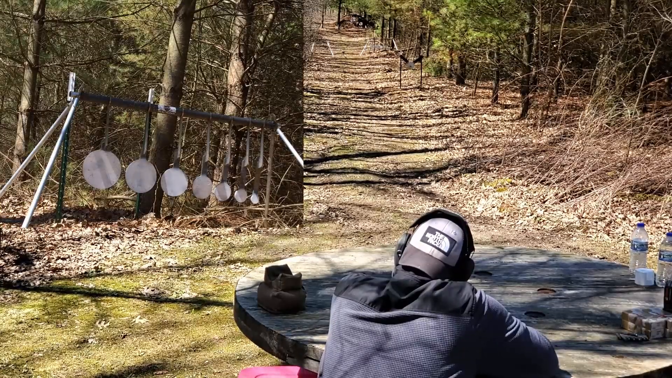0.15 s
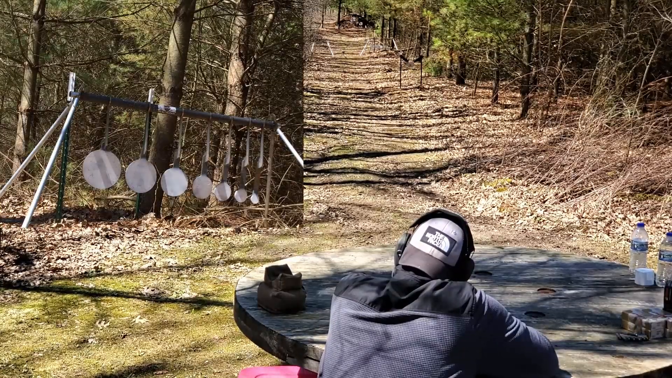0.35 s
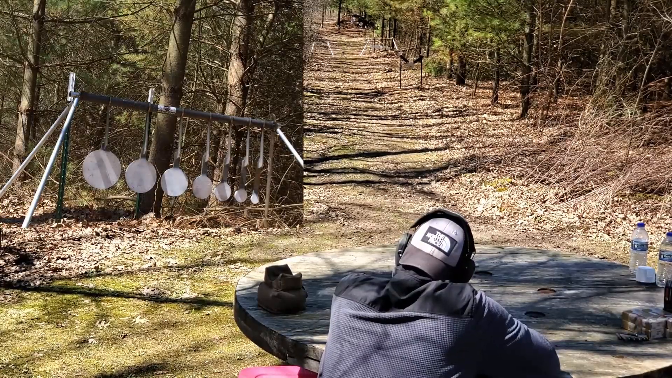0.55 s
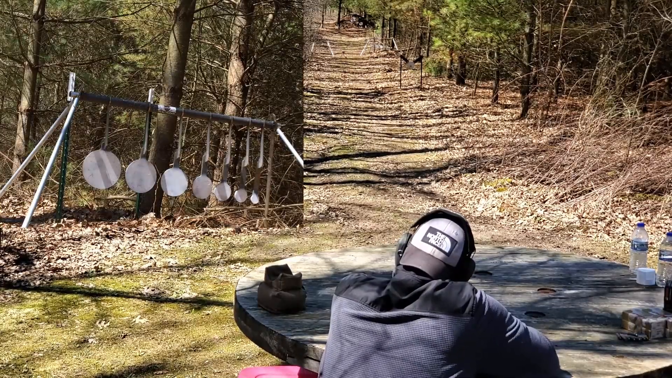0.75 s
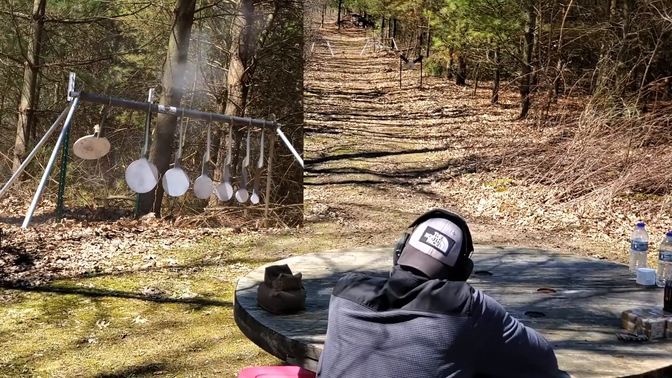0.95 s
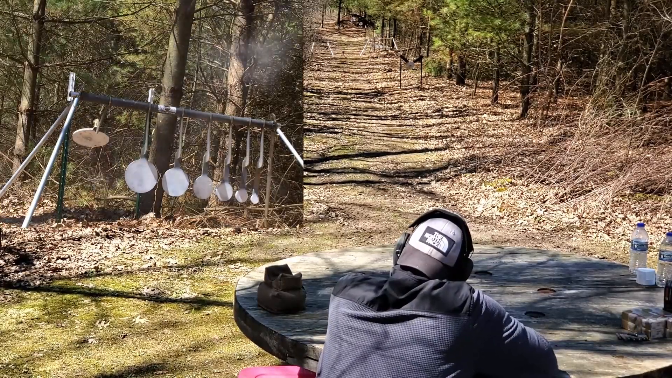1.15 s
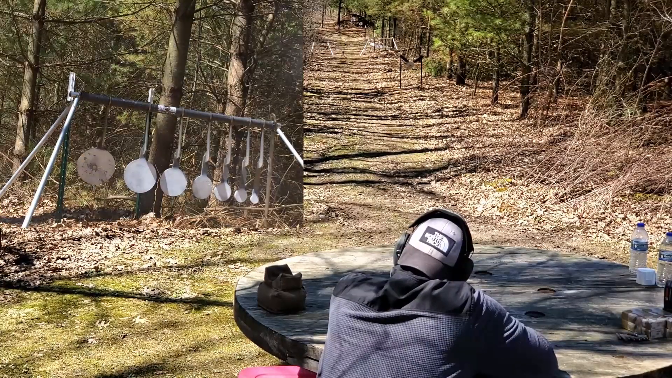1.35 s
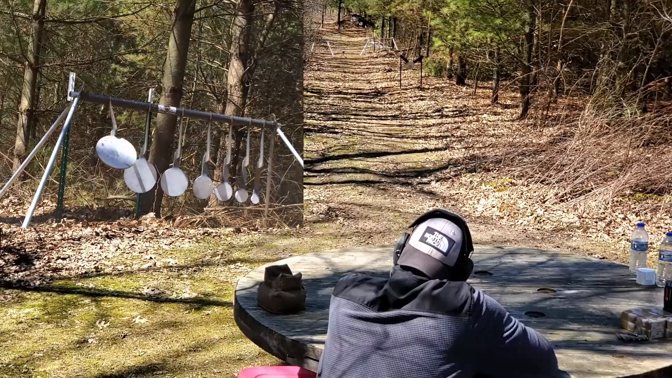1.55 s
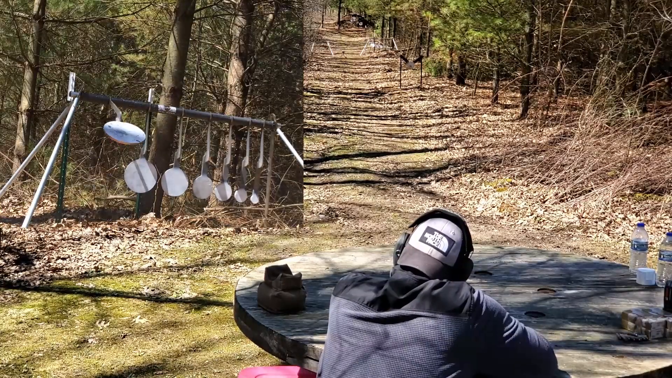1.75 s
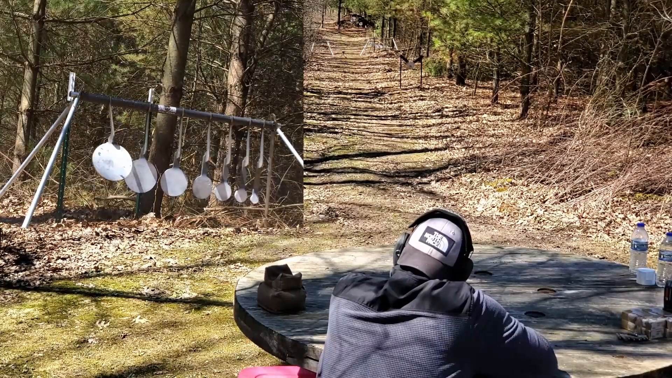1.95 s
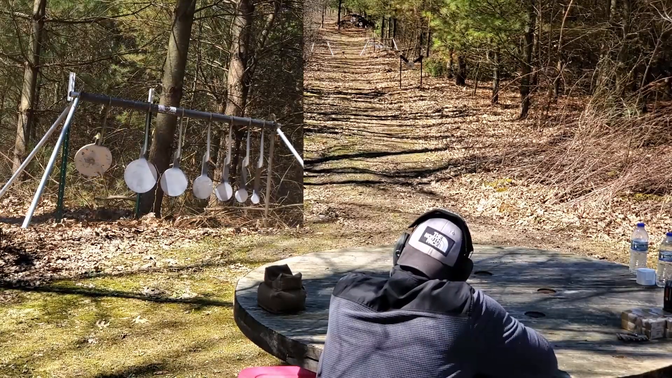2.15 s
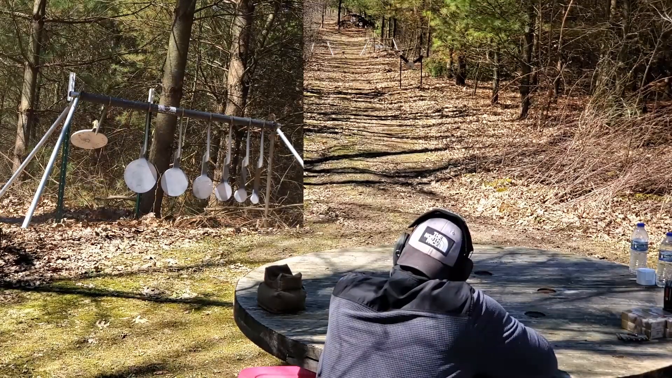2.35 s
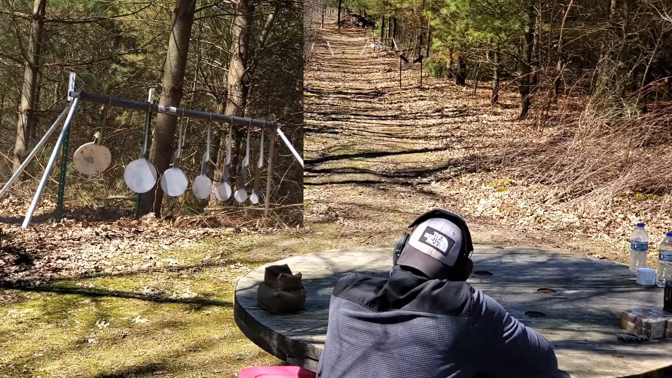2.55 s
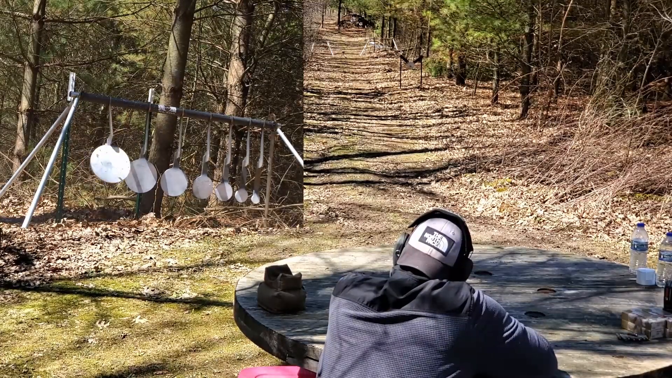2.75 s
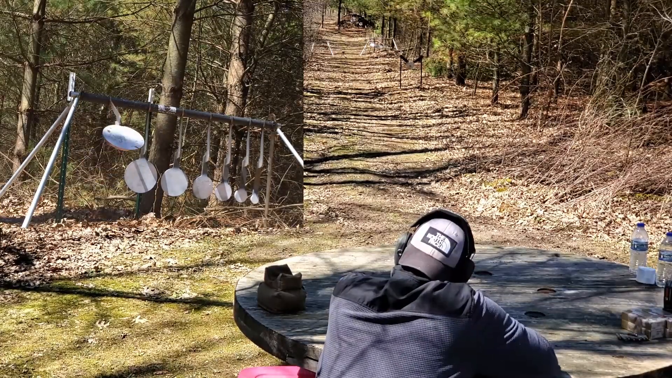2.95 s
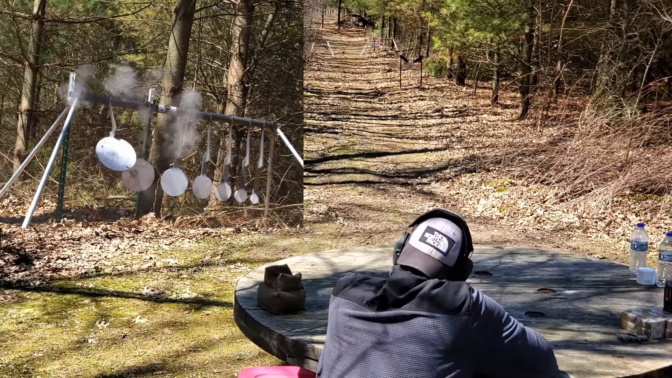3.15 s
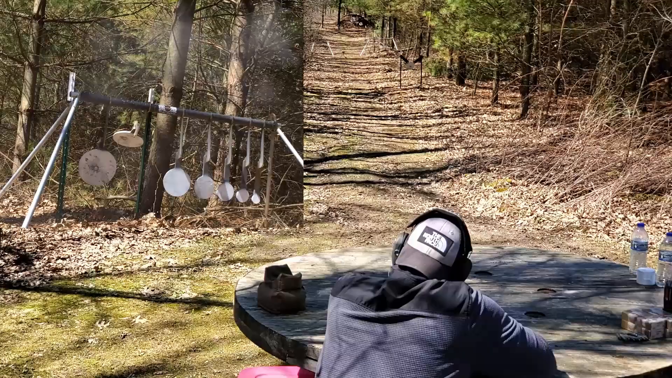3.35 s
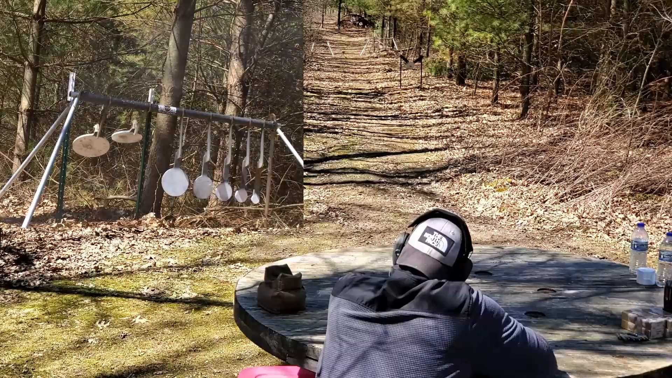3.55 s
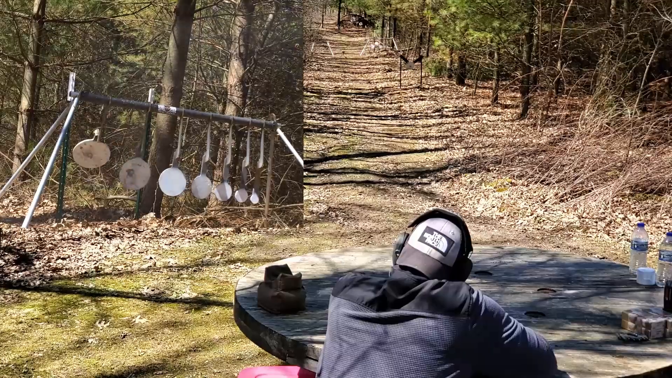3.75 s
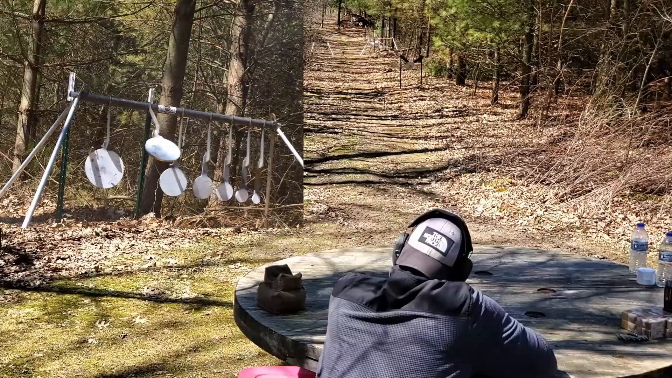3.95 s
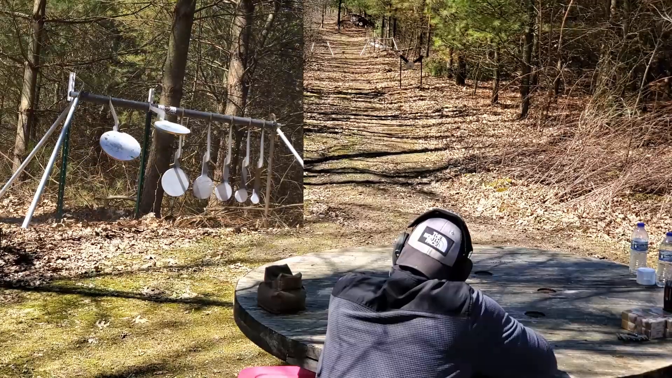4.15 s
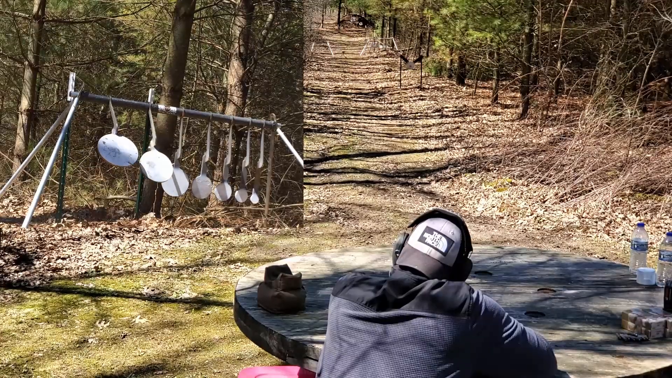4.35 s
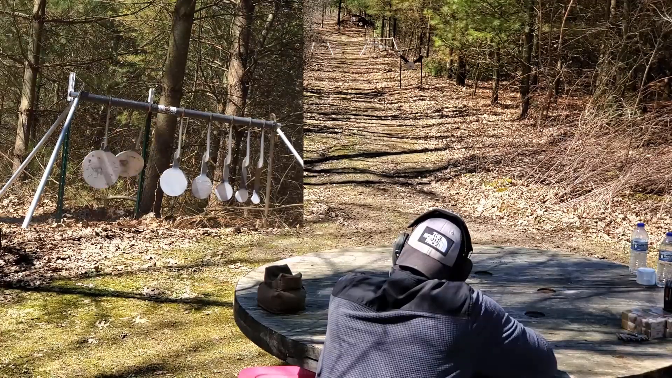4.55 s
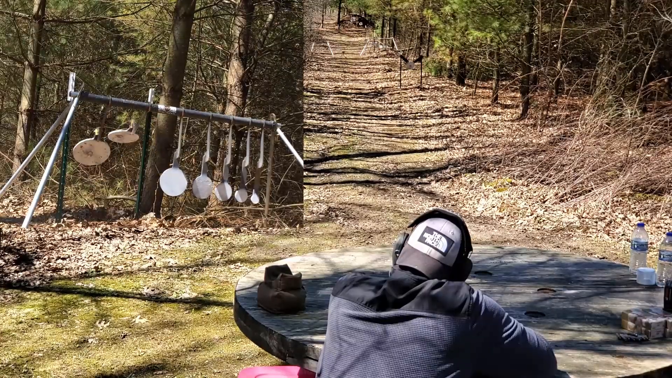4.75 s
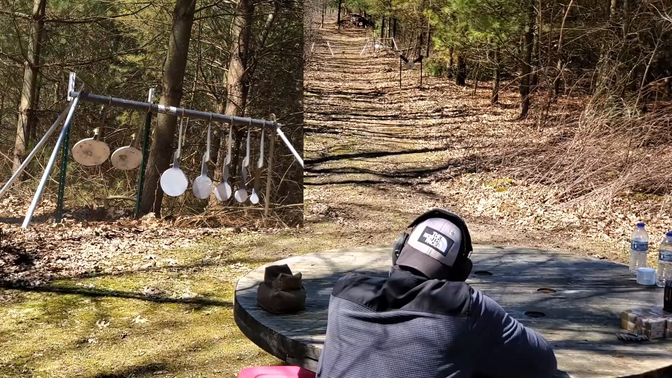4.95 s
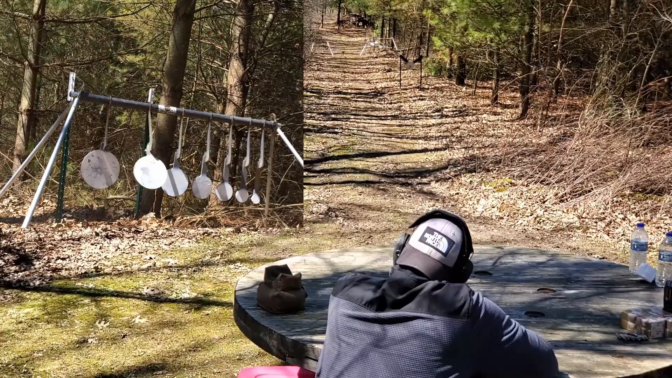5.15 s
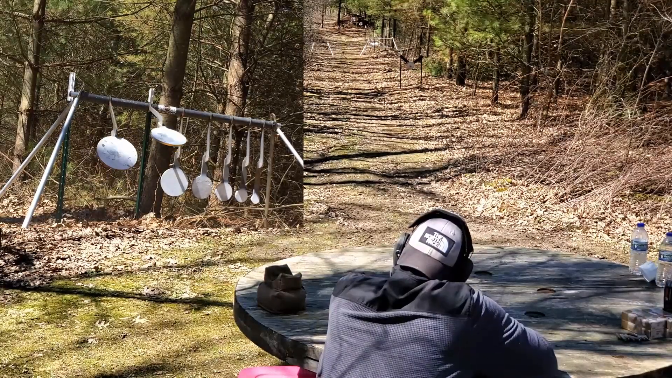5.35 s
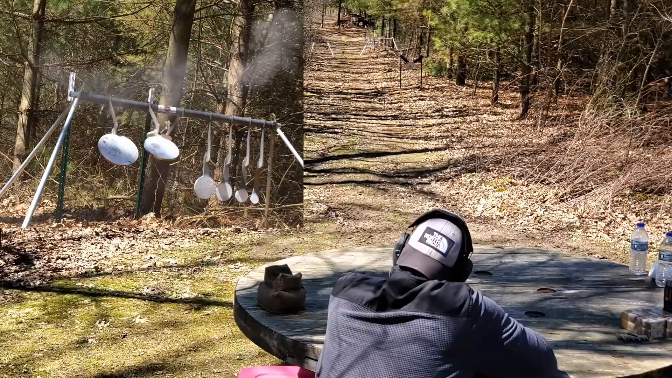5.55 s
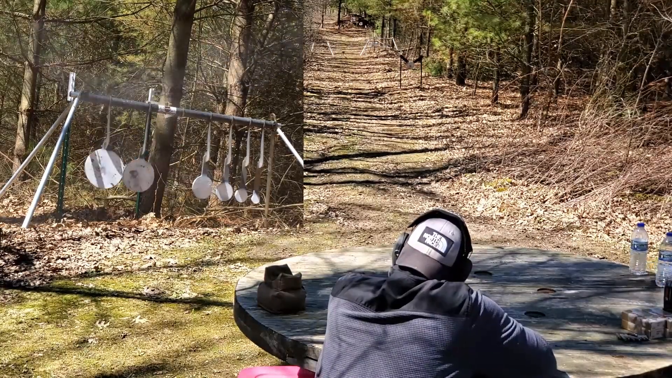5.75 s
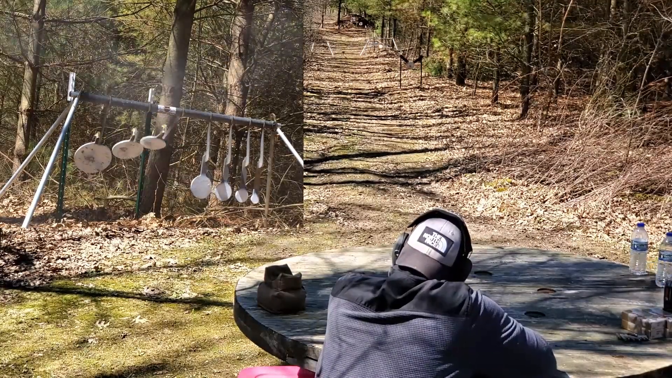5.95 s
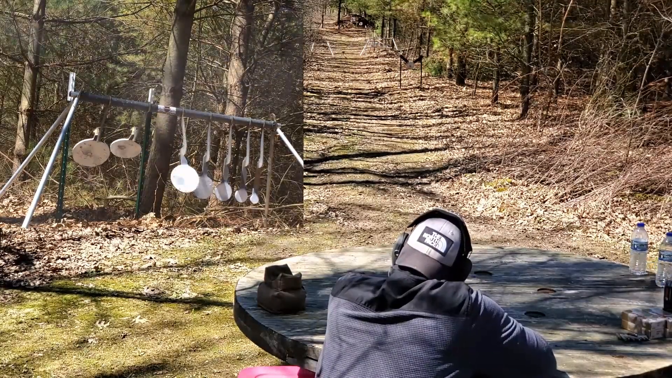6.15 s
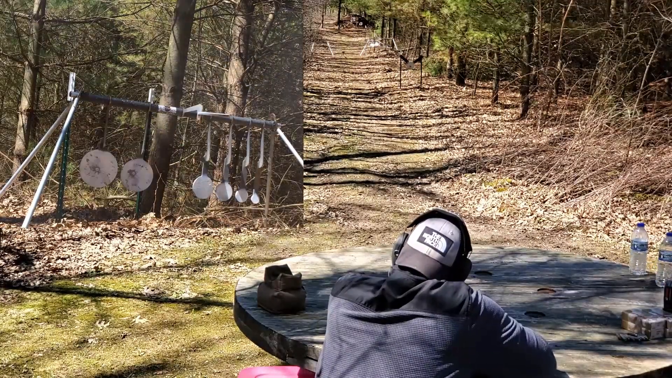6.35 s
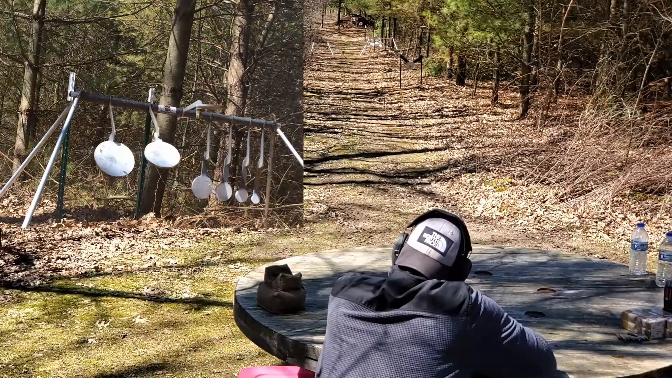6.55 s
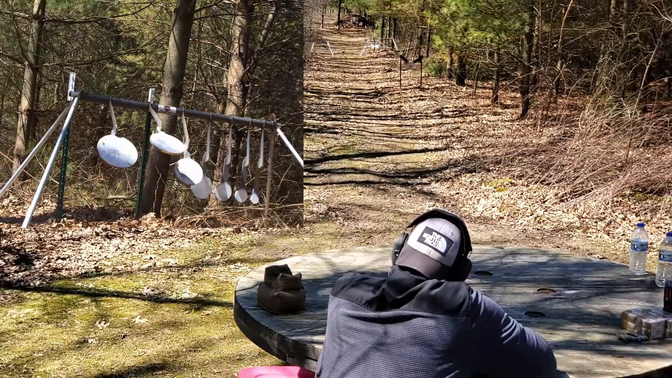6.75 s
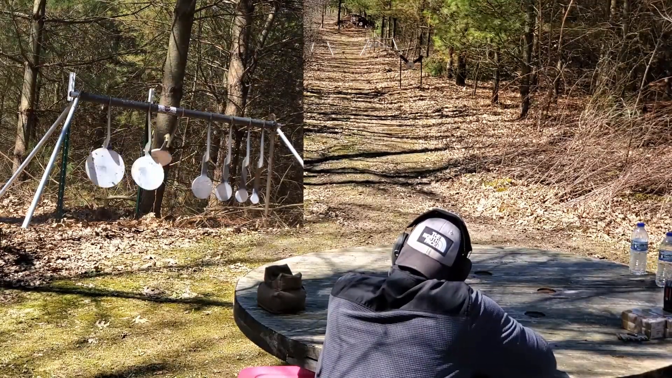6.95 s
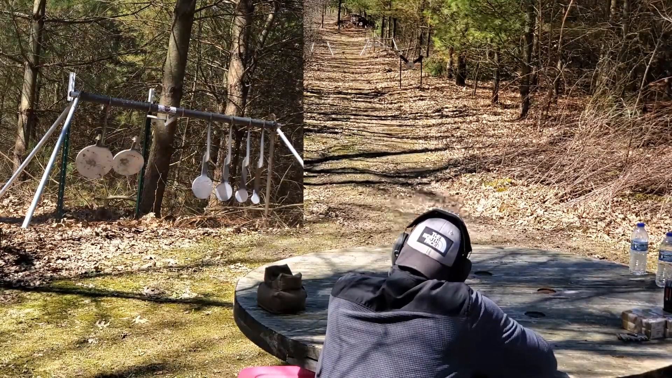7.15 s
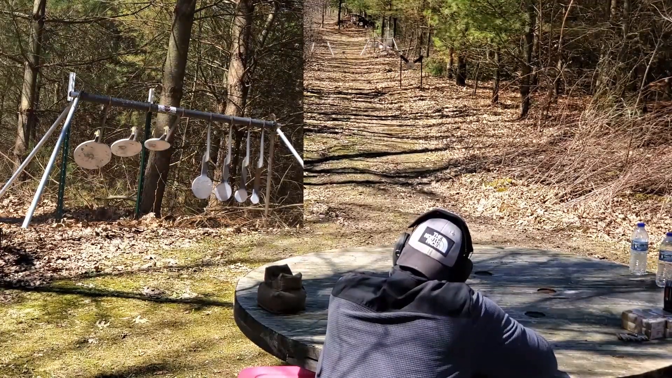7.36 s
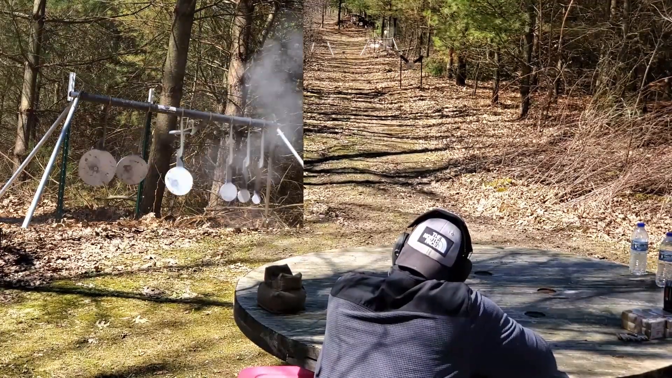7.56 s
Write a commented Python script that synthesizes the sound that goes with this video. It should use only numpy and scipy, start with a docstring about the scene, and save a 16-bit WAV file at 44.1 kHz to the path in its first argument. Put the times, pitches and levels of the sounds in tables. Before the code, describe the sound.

Very quiet woodland air for half a second, then a tiny firing-pin click and a huge rifle blast at 0.55 s, hard-clipped at the shooter's microphone, with bright slaps from trunks and a hollow echo rolling away for over a second. A faint distant ring arrives near 0.78 s; at 0.89 s the close target microphone catches a sharp bullet smack, a hissing lead spray and a clear ring around 4.5 kHz, fading and returning as the plate swings. From about 2 s fragments tick on dry leaves over fine dust; a handling click falls at 2.8 s. The second shot at 2.9 s strikes at 3.25 s, ringing near 6 kHz, followed by patter. The third fires at 5.15 s and hits at 5.5 s with a shorter, mixed ring; ticks and faint clinks follow. The fourth fires at 7.2 s, hitting at 7.54 s with a thin ring near 11 kHz, its tail ending the scene.

```python
"""Rifle shots on steel in the woods

Four rifle shots at a woodland range, heard by two cameras mixed together. By the shooter, shaped noise gives
the blast, which overloads the microphone and rolls away among the trees. By the targets each bullet bursts on
a hanging steel plate: noise for the lead spray, decaying sines for the ringing plate, and noise bursts for
fragments pattering down on dry leaves. Clicks, clinks and the quiet air of the woods lie around them.
"""
import sys
import numpy as np
from scipy import signal
from scipy.fft import rfft, irfft, next_fast_len
from scipy.io import wavfile
from scipy.ndimage import map_coordinates

SR = 44100
rng = np.random.default_rng(int(sys.argv[2]) if len(sys.argv) > 2 else 0)


def unload_audio(sound):
    """Save the sound as a 16-bit wav file, at the path given as the first command line argument."""
    columns = np.transpose(np.atleast_2d(sound))
    # keep every value between -1 and 1, then stretch to whole-number steps
    steps = np.round(np.clip(columns, -1, 1) * 32767)
    wavfile.write(sys.argv[1], SR, steps.astype(np.int16))


N = 336042  # samples

# The four shots. Each row: start in seconds, strength in dB, level in dB of the short bright noise just ahead
# of the blast.
SHOTS = [(.548, 0.04, -10.5), (2.905, -0.77, -17), (5.152, 0.3, -12.5), (7.192, -0.9, -16.5)]
# Decay of the answer of the woods. Each row: time after the shot in seconds, level in dB.
WOODS_DECAY = [(0, 1), (.03, -5), (.1, -1.5), (.2, -12.5), (.282, -12), (.294, -20), (.34, -15),
               (.5, -21.5), (.62, -25.5), (.75, -27), (1.15, -33.5), (1.4, -43), (1.75, -52), (3, -65.5)]
# Spectrum of the young echo. Each row: frequency in Hz, relative density in dB per Hz.
BOOM_COLOUR = [(25, -38.5), (60, -9), (130, -9.5), (250, -7.5), (350, -5), (420, 0), (500, 0), (580, -4.5),
               (750, -11.5), (1200, -19), (2500, -21), (6000, -32.5), (16000, -38)]
# Extra loss of the echo as it ages. Each row: frequency in Hz, loss in dB per second.
WOODS_DULLING = [(60, -8.5), (200, -0.5), (450, 3), (1000, -3), (2000, 3), (3000, 7.5), (4500, 17.5),
                 (8000, 36.5), (16000, 63)]
# Farther slopes that answer with a soft swell. Each row: time after the shot in seconds, rise in dB.
SLOPES = [(.37, 1.5), (.54, 3), (.98, 0.3), (1.17, 0.5)]
# Trunks that send back a bright slap. Each row: time after the shot in seconds, peak level in dB relative
# to the shot, length in seconds.
TRUNKS = [(0.018, -15, 0.011), (0.058, -11, 0.016), (.083, 0.5, 0.017), (0.114, -17, .012),
          (.16, -13, .012), (0.21, -17, 0.017)]
SLOPE_S = .025  # half width of a swell
SLAP_SCATTER_S = .003  # from shot to shot


def rifle():
    """Impulse response of a forest: a muzzle crack, dense scattered reflections and discrete bright slaps."""
    out, t = np.zeros(N), np.arange(3 * SR) / SR
    nearby = round(.288 * SR)  # the bright crowd of slaps stops here
    crowd_colour = [(1500, -18.5), (5000, 0.2), (10000, 9), (16000, -18.5)]
    swells_db = sum(db * np.exp(-((t - s) / SLOPE_S) ** 2) for s, db in SLOPES)
    woods_db = np.interp(t, *np.transpose(WOODS_DECAY)) + swells_db
    for s, db, _ in SHOTS:
        roll = fading(len(t), BOOM_COLOUR, lambda hz: along(WOODS_DULLING, hz))
        roll_db = woods_db + 0.88 * wobble(len(t), rate=12) + 1.6 * wobble(len(t), rate=45)
        add(out, s, amp(db + roll_db) * roll * (1 - np.exp(-t / 0.0059)))

        crack = puff(4100, 2.5, spread=3.4)[:round(.009 * SR)]
        add(out, s, amp(db + 8.5) * crack)

        # many small slaps crowd together
        crowd = fading(nearby, crowd_colour, lambda hz: 70 + 0 * hz)
        add(out, s, amp(db - 23 + 5.6 * wobble(nearby, rate=190)) * crowd)

        for delay, slap_db, length in TRUNKS:
            u = np.arange(SR // 10) / SR / np.abs(length)
            slap = puff(6500, 1.7, spread=0.44) * u * 3 * np.exp(1 - 3 * u)  # swells for a third of its length
            late = SLAP_SCATTER_S * rng.standard_normal()
            add(out, s + delay + late, amp(db + slap_db) * slap)
    return out


# Bullets on steel. Each row: start in seconds, strength in dB, time in seconds when the shooter hears
# the ring, ring level there in dB.
HITS = [(0.8892, -0.6, .778, -11), (3.246, -0.3, 3.113, -10), (5.493, -0.5, 5.37, -11.5),
        (7.537, -1.3, 7.425, -25)]
# Modes of the four plates, one list a plate. Each row: frequency in Hz, level in dB, t60 in seconds,
# time in seconds until the mode's lobe turns to the microphone.
PLATES = [
    [(4505, -4, 1.1, .115), (4743, -12, .5, .11), (7376, -12, .45, .08), (7410, -16, .5, .11),
     (7585, -15, .75, .12), (7988, -28, .6, .01), (8527, -20, .7, .02), (10179, -22, .4, .04),
     (10809, -26, .4, .02), (12508, -15, .5, .02), (12545, -19, 1.15, .09), (13705, -24, .4, .05),
     (15019, -21, .4, .02), (15160, -36, .8, .01), (15622, -42, .5, .01)],
    [(5964, -7, .7, .075), (6040, -24, 1.1, .06), (6206, -10, .55, .1), (9738, -23, .6, .05),
     (9786, -18, .7, .1), (10029, -22, .6, .05), (10594, -26, .45, .04), (11794, -30, .6, .12),
     (13361, -35, 1.8, .14), (14486, -31, .9, .02), (14944, -35, .4, .02), (15040, -34, .4, .05),
     (15127, -35, .4, .05)],
    [(5130, -9, .22, .025), (7851, -18, .8, .03), (7889, -14, 1.1, .08), (7983, -13, 1.5, .14),
     (8500, -28, .5, .08), (12984, -18, .6, .01), (13030, -21, .9, .01), (13175, -26, 1.0, .1),
     (13970, -31, .4, .01), (14211, -33, .4, .05), (15302, -36, .5, .01), (15680, -28, .7, .01),
     (15719, -26, .8, .01)],
    [(10700, -26, .6, .04), (11116, -10, .8, .035), (11162, -18, .8, .03), (11790, -32, .6, .04),
     (12500, -35, .5, .01), (13210, -37, .5, .01), (13840, -40, .5, .01), (14620, -35, .5, .02),
     (15650, -38, .2, .01)],
]
# How each plate faces the microphone, swings edge-on, turns back and then away. Each row: facing level in dB,
# end of facing in seconds after the hit, edge-on time in seconds, edge-on level in dB, time back in seconds,
# level back in dB, speed towards the microphone in m/s.
SWINGS = [(0.5, 0.152, .37, -23, 0.56, -3, 3), (4.5, 0.087, 0.36, -25.5, 0.71, -8, 0),
          (-0.8, 0.13, .42, -23, 0.69, -15, -1.5), (6.5, 0.035, 0.24, -20, .6, -10, -5)]
# Spectrum of the bullet burst. Each row: frequency in Hz, relative density in dB per Hz.
BURST_COLOUR = [(200, -23.5), (600, 1.5), (1500, -0.5), (3000, 1.5), (6000, -0.5), (11000, -1.5),
                (16000, -14)]
# The lead spray and its echoes among the near trees. Each row: time after the hit in seconds, level in dB.
SPRAY_DECAY = [(0, -14.5), (.03, -17), (.1, -13.5), (.17, -16), (.22, -18.5), (.28, -23.5), (.4, -28),
               (.7, -37), (1.2, -66)]
# Extra loss of the spray as it ages. Each row: frequency in Hz, loss in dB per second.
SPRAY_DULLING = [(300, -7.5), (1500, -3), (4000, 38.5), (8000, 70), (16000, 121)]


def steel():
    """Impact excitation: burst and modal ring by the targets, and the faint ring that reaches the shooter.

    The shooter's camera runs a little ahead. Returns the sound at the targets and at the shooter.
    """
    near, far = np.zeros(N), np.zeros(N)
    t = np.arange(round(1.2 * SR)) / SR
    far_t = t[:SR // 4]
    smack = t[:200] / 0.000059
    for (s, db, far_s, far_db), modes, motion in zip(HITS, PLATES, SWINGS):
        spray = fading(len(t), BURST_COLOUR, lambda hz: along(SPRAY_DULLING, hz))
        spray_db = np.interp(t, *np.transpose(SPRAY_DECAY)) + 1.4 * wobble(len(t), rate=76)
        add(near, s, amp(db + spray_db) * spray)
        add(near, s, amp(db - 17) * (smack - 1) * np.exp(-smack))  # brief pressure pulse
        add(near, s, amp(db - 10.5) * puff(9000, 0.06, spread=1.1))  # the bullet shatters
        add(near, s, ring(modes, len(t), *swing(t, *motion)))

        # air takes the treble on the way to the shooter
        dull = [(hz, level - .8 * hz / 1000, t60, .003) for hz, level, t60, _ in modes]
        add(far, far_s, ring(dull, len(far_t), far_db - 150 * far_t, 0 * far_t))
    return near, far


def ring(modes, size, facing_db, speed):
    """Modal synthesis: decaying sines whose lobes turn with the swing and whose pitch bends by Doppler shift."""
    t = np.arange(size) / SR
    heard = np.cumsum(1 + speed / 343) / SR  # time as compressed by the plate's approach
    total = np.zeros(size)
    for hz, db, t60, turn in modes:
        flutter = amp(1.5 * wobble(size, rate=14) + 2.5 * wobble(size, rate=70))  # scattered by trunks
        lobe = 1 - np.exp(-(t / turn) ** 4)
        tone = np.sin(2 * np.pi * (hz * heard + rng.random()))
        total += amp(db - 60 * t / t60) * flutter * lobe * tone
    return amp(facing_db) * total * (1 - np.exp(-t / 0.0043))


BACK_HOLD_S, AWAY_S, AWAY_DB = 0.083, 0.32, -40  # how long it faces again, time to turn away, level then


def swing(t, facing_db, until, edge, edge_db, back, back_db, speed):
    """Directivity and motion: how a swinging plate faces the microphone (dB) and how fast it nears it (m/s)."""
    when = [until, edge, back, back + BACK_HOLD_S, back + BACK_HOLD_S + AWAY_S]
    level_db = np.interp(t, when, [facing_db, edge_db, back_db, back_db, AWAY_DB])
    return level_db, np.interp(t, [until, edge], [0, speed])


# The loudest fragments landing on leaves. Each row: start in seconds, peak level in dB, centre in Hz.
PATTER = [(1.9729, -45, 8960), (2.0782, -36.5, 3300), (2.1251, -39, 10100), (2.1889, -40, 6380),
          (2.2697, -40, 6370), (2.2946, -36, 7260), (2.3336, -40, 10700), (2.4219, -40, 6830),
          (2.4633, -40, 10900), (2.5052, -42, 7780), (3.9232, -32.5, 6280), (3.9724, -35.5, 6900),
          (4.0537, -37, 8280), (4.1111, -38, 5640), (4.3111, -42, 5540), (4.4034, -43, 9680),
          (4.4702, -39, 10200), (4.565, -40, 9010), (4.6783, -43, 7810), (6.3614, -38, 6870),
          (6.4617, -43, 5260), (6.4971, -40, 6370), (6.5186, -42, 6340), (6.6238, -45, 10100),
          (6.9174, -35.5, 9810)]
TICK_T60, TICK_SPREAD = 0.011, .5  # s, width over centre
TICKS = 14  # fainter fragments after each hit
TICK_FIRST_S, TICK_SPAN_S = .85, 1.05  # earliest landing after the hit, span of landings
TICK_DB, TICK_FADE_DB, TICK_SCATTER_DB = -43.5, 9, 1  # first level, fall over the span, random spread
TICK_HZ = 8000  # middle of the scattered centres
DUST_DB = -53  # the rain of lead dust, before its decay


def fragments():
    """Random impacts: single ticks on leaves over a fine rain of lead dust that thins out after each hit."""
    out = np.zeros(N)
    for s, db, hz in PATTER:
        add(out, s, amp(db) * puff(hz, TICK_T60, TICK_SPREAD))

    t = np.arange(round(2.4 * SR)) / SR
    falling = np.clip(np.minimum(t / 0.96, (2.4 - t) / 0.32), 0, 1)  # the dust needs time to come down
    dust_colour = [(1500, -26.5), (4000, -4), (7000, 0.5), (12000, 0), (16000, -11.0)]  # (Hz, dB)
    for s, *_ in HITS:
        for late, size, pitch in zip(rng.random(TICKS), *rng.standard_normal((2, TICKS))):
            db = TICK_DB - TICK_FADE_DB * late + TICK_SCATTER_DB * size
            tick = puff(TICK_HZ * 1.3 ** pitch, TICK_T60, TICK_SPREAD)
            add(out, s + TICK_FIRST_S + TICK_SPAN_S * late, amp(db) * tick)

        chance, rarity = rng.random((2, len(t)))
        landing = chance < 1500 / SR  # about 1500 grains a second
        grains = landing * amp(-5.5 * np.log(rarity + .01)) * rng.standard_normal(len(t))
        dust = unit(unit(grains) + 1.2 * rng.standard_normal(len(t)))
        dust = filtered(dust, lambda hz: amp(along(dust_colour, hz)))
        dust_db = DUST_DB - 6.1 * t + 1.1 * wobble(len(t), rate=16)
        add(out, s, amp(dust_db) * dust * falling)
    return out


# Handling clicks near the shooter. Each row: start in seconds, peak level in dB, centre in Hz, t60 in seconds,
# width over centre.
CLICKS = [(2.785, -55, 1920, .06, 0.29), (2.8255, -28, 6800, 0.02, 0.3), (2.83, -35, 8000, 0.049, 1.6),
          (2.655, -53.5, 2500, .02, .8), (6.108, -45, 5400, .04, .12), (7.064, -53, 5060, .04, .3)]
# Faint metal clinks. Each row: start in seconds, frequency in Hz, level in dB, t60 in seconds.
CLINKS = [(6.797, 3612, -52, .16), (6.797, 2900, -55, 0.067), (7.062, 3585, -65, 0.15),
          (7.08, 4088, -63, .08)]
PRECLICK_LEAD_S, PRECLICK_HZ, PRECLICK_T60 = .0053, 4940, 0.062  # a short bright noise just ahead of each blast


def clicks():
    """Damped resonance: a short bright noise just ahead of each shot, a little handling and a few clinks."""
    out, t = np.zeros(N), np.arange(SR // 4) / SR
    for s, _, db in SHOTS:
        add(out, s - PRECLICK_LEAD_S, amp(db) * puff(PRECLICK_HZ, PRECLICK_T60, spread=1.7))
    for s, db, hz, t60, spread in CLICKS:
        add(out, s, amp(db) * puff(hz, t60, spread))
    for s, hz, db, t60 in CLINKS:
        add(out, s, amp(db - 60 * t / t60) * np.sin(2 * np.pi * hz * t))
        add(out, s, amp(db + 2) * puff(hz, .03, spread=.6))
    return out


# Spectrum of the quiet woods. Each row: frequency in Hz, relative density in dB per Hz.
AIR_COLOUR = [(15, -47), (30, -13.5), (100, -7), (250, -14.5), (480, -9.5), (900, -22), (2200, -32),
              (11000, -41), (15000, -60)]
AIR_DB = -60.5  # middle of a slowly wandering level


def quiet_woods():
    """Stationary coloured noise: the background air, its level wandering slowly."""
    return amp(AIR_DB + wobble(N, rate=5)) * fading(N, AIR_COLOUR, lambda hz: 0 * hz)


def overload(x, top, hardness, low_hz):
    """Saturation and AC coupling: the shooter's microphone clips, then its coupling lets the flat tops sag."""
    flat = x / (1 + np.abs(x / top) ** hardness) ** (1 / hardness)
    return filtered(flat, lambda f: 1j * f / (low_hz + 1j * f))


def limiter(x, top):
    """Soft saturation: the target camera rounds off its highest peaks."""
    return top * np.tanh(x / top)


def fading(size, colour, loss):
    """Frequency-dependent decay: noise of rms about 1 at its start, losing loss(Hz) dB a second."""
    noise = rng.standard_normal(size)
    hz, t, z = signal.stft(noise, SR, nperseg=1024)
    gain = amp(along(colour, hz))[:, None]
    gain = gain / np.sqrt(np.mean(gain ** 2))
    decay = amp(-loss(hz)[:, None] * t)
    return signal.istft(z * gain * decay, SR, nperseg=1024)[1][:size]


def puff(hz, t60, spread):
    """Resonant filtering: a decaying noise burst of peak about 1 around hz, spread = width over centre."""
    t = np.arange(SR // 10) / SR

    def band(f):
        width = 1j * f * spread * hz
        return width / (hz * hz - f * f + width)

    return unit(filtered(rng.standard_normal(len(t)), band)) * amp(-6 - 60 * t / t60)


def wobble(size, rate):
    """Band-limited fluctuation: a smooth random curve through rate knots a second."""
    knots = rng.standard_normal(int(size * rate / SR) + 4)
    return map_coordinates(knots, [np.arange(size) * rate / SR])


def filtered(x, response):
    """Linear filtering: multiplies the spectrum of x by a complex response of frequency."""
    m = next_fast_len(len(x) + 8192)  # room for the filter's tail
    return irfft(rfft(x, m) * response(np.fft.rfftfreq(m, 1 / SR)), m)[:len(x)]


def along(points, hz):
    """Logarithmic frequency scale: interpolates (Hz, value) points on a log axis."""
    f, v = np.transpose(points)
    return np.interp(np.log(hz + 1), np.log(f + 1), v)


def amp(db):
    """Decibel law: level in dB to amplitude."""
    return 10 ** (np.asarray(db) / 20)


def unit(x):
    """Normalisation of power: scales x to rms 1."""
    return x / np.sqrt(np.mean(x ** 2) + 1e-20)


def add(track, s, sound):
    """Superposition: mixes a sound into the track from time s in seconds."""
    part = track[round(s * SR):][:len(sound)]
    part += sound[:len(part)]


def scene():
    """Superposition of the two cameras, each with its own saturation, and the quiet woods."""
    near, far = steel()
    shooter = overload(rifle() + clicks() + far, top=0.32, hardness=4.2, low_hz=102)
    targets = limiter(near + fragments(), top=0.61)
    return (shooter + targets + quiet_woods())[None]


TOP_HZ = 15600  # the band limit begins here


def record(dry):
    """Band limiting: a cosine slope 500 Hz wide above TOP_HZ, and nothing beyond it."""
    def slope(hz):
        return np.cos(np.pi / 2 * np.clip((hz - TOP_HZ) / 500, 0, 1)) ** 2

    return filtered(dry[0], slope)[None]


dry = scene()
out = record(dry)
unload_audio(out)
```